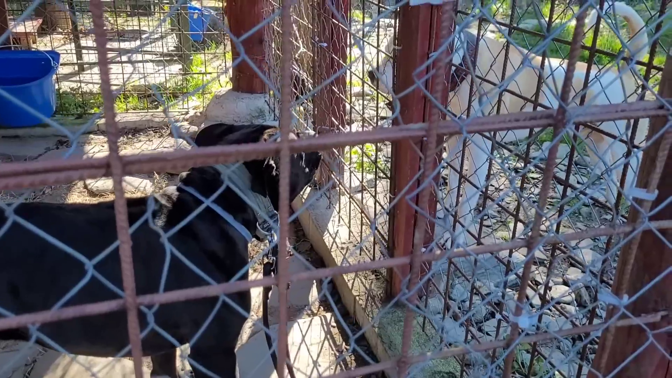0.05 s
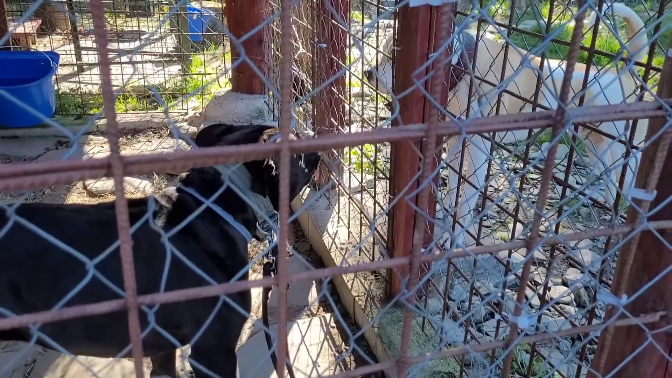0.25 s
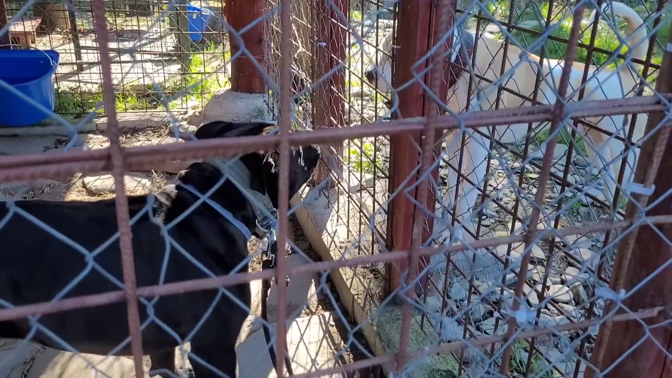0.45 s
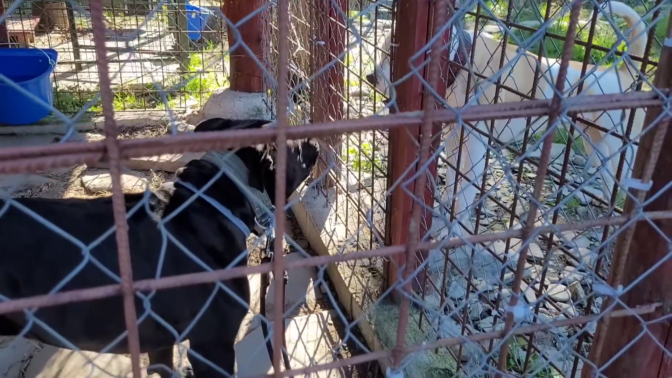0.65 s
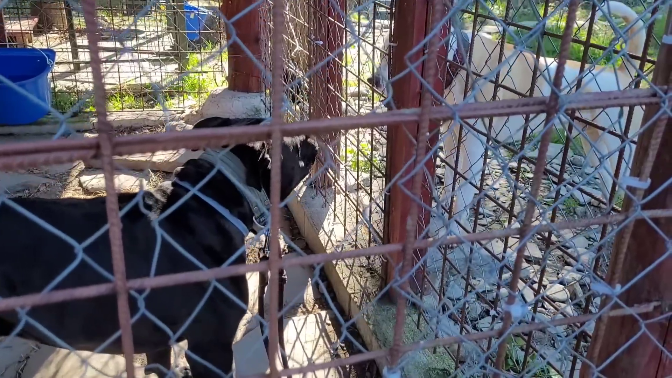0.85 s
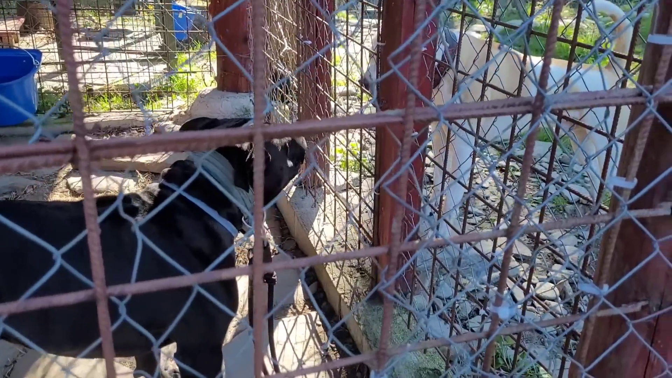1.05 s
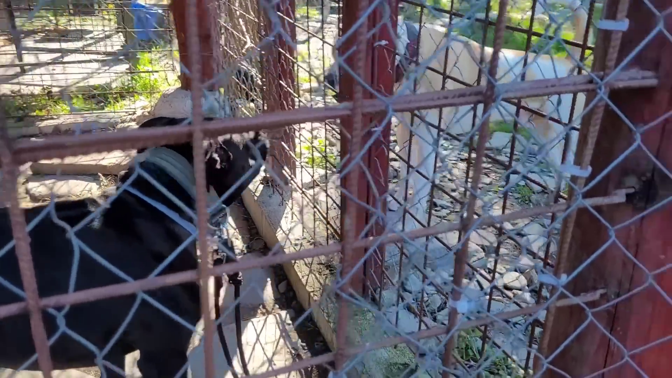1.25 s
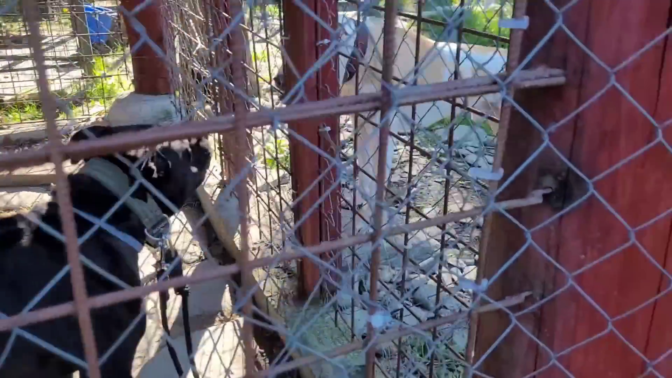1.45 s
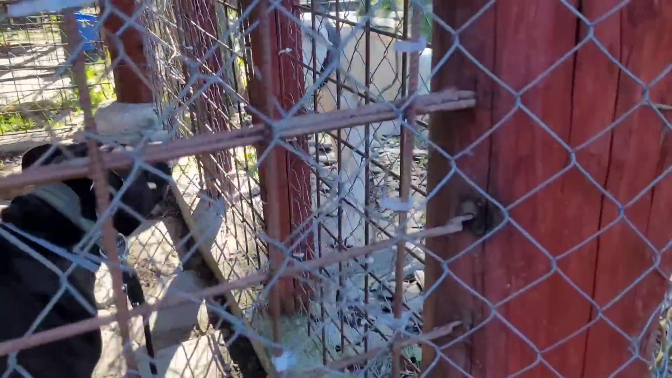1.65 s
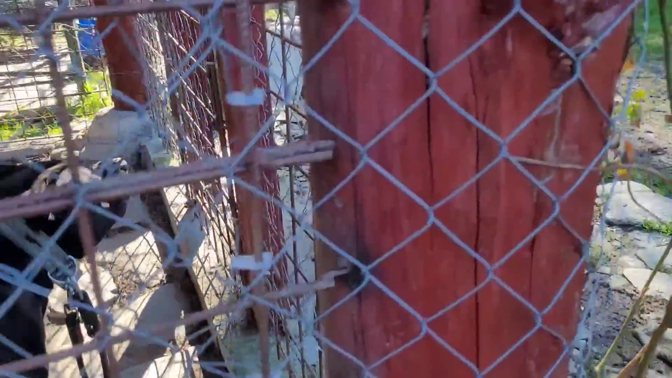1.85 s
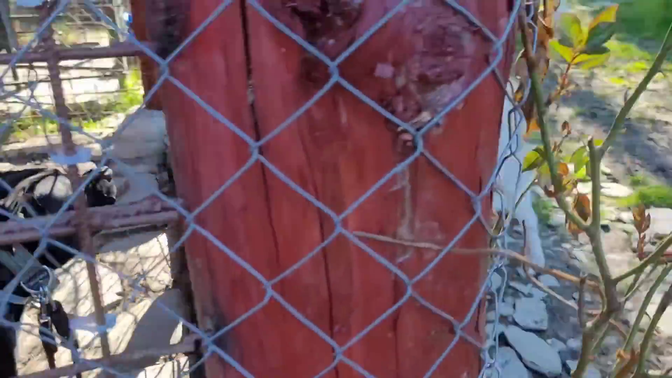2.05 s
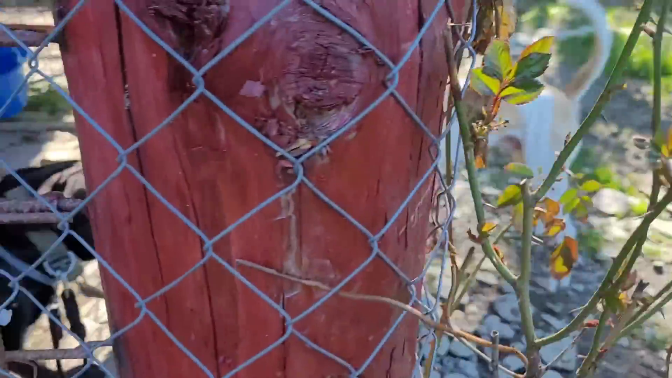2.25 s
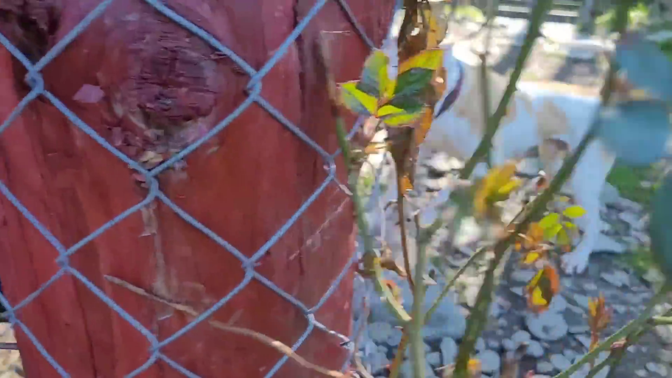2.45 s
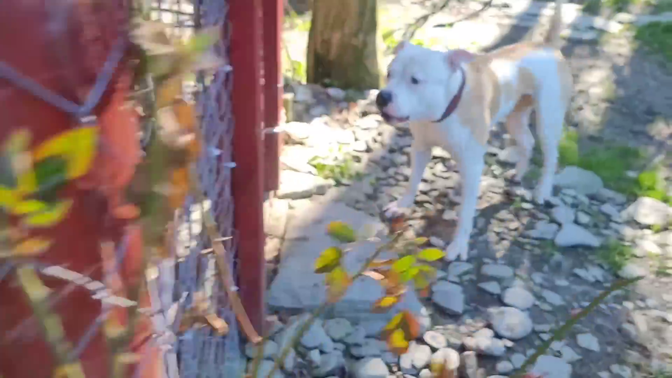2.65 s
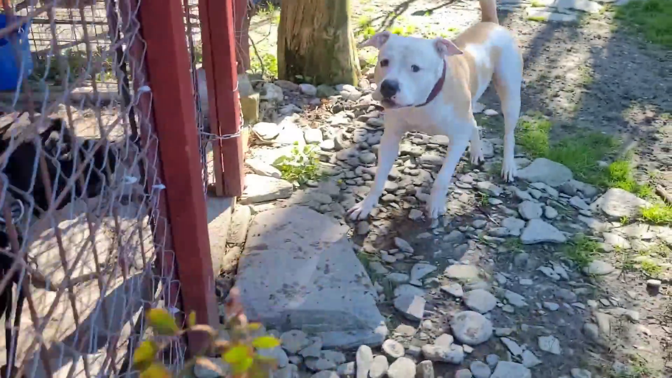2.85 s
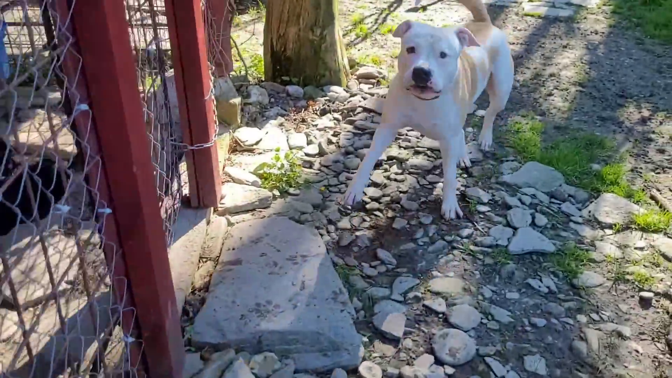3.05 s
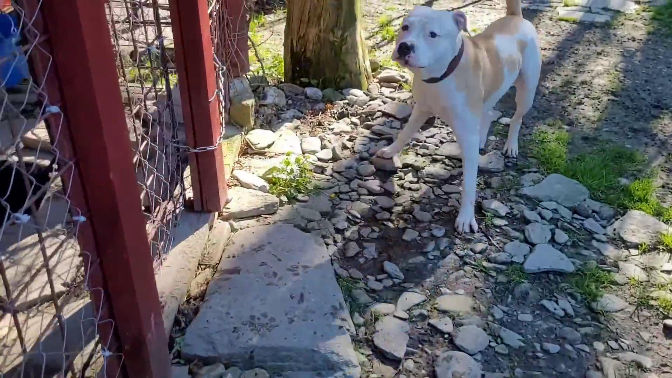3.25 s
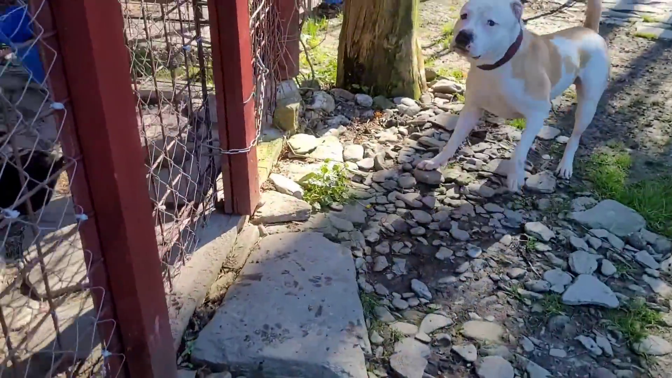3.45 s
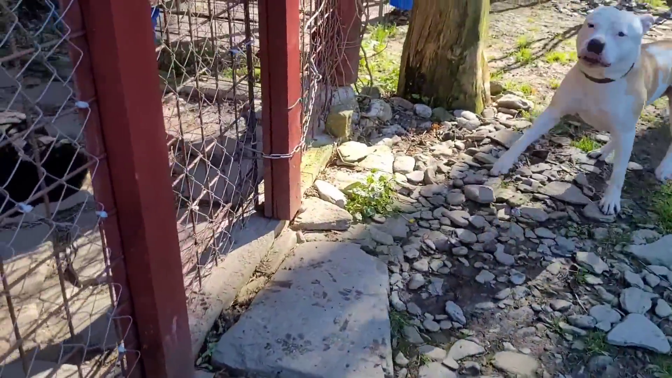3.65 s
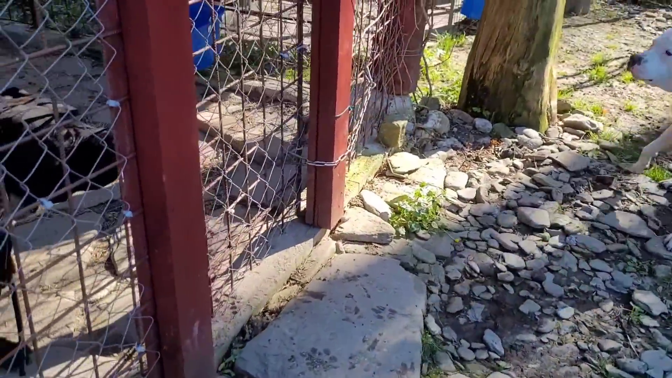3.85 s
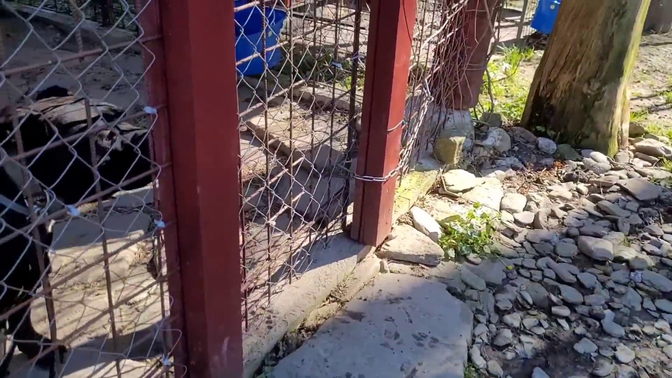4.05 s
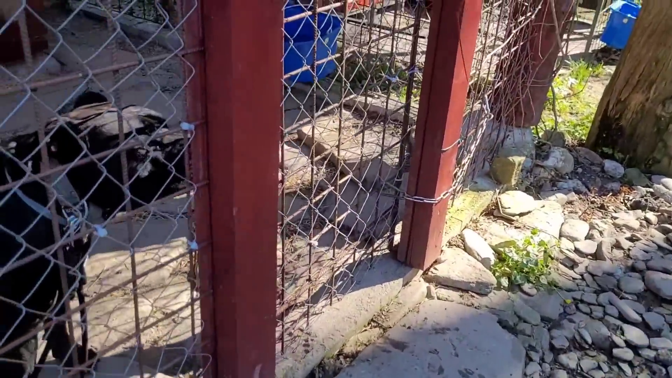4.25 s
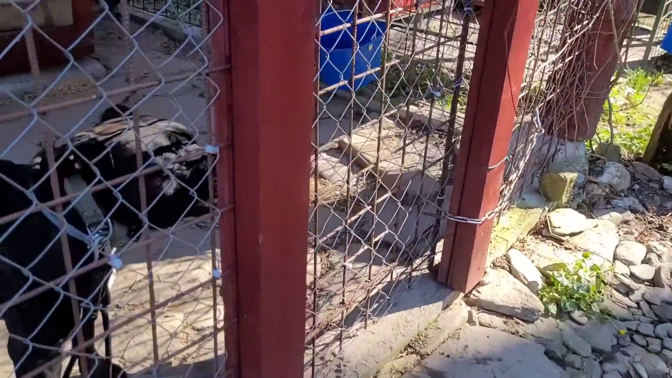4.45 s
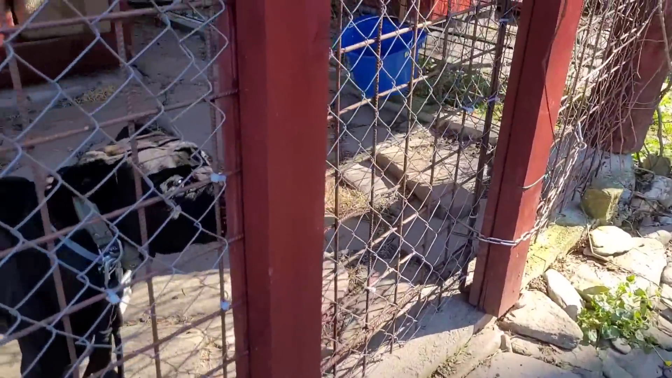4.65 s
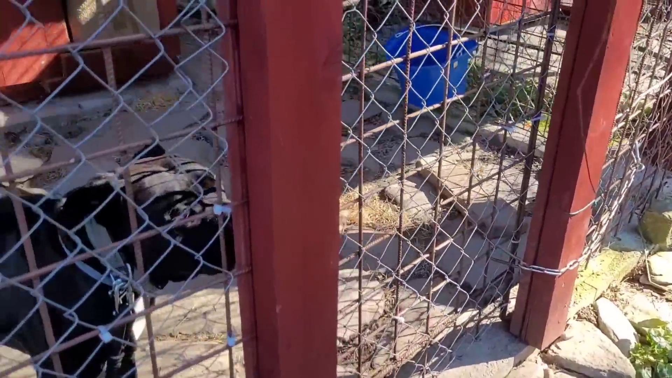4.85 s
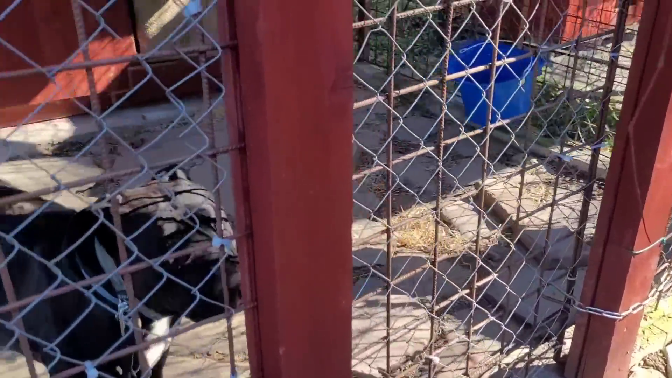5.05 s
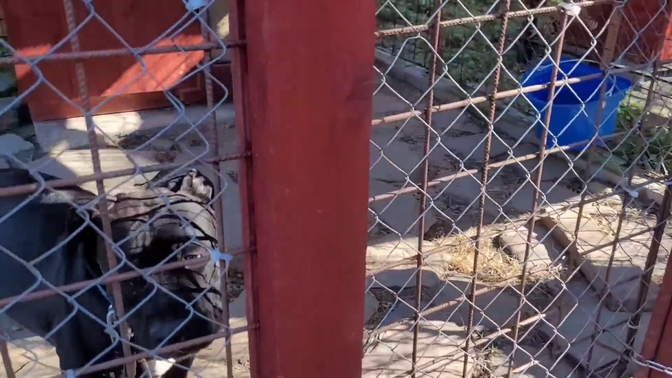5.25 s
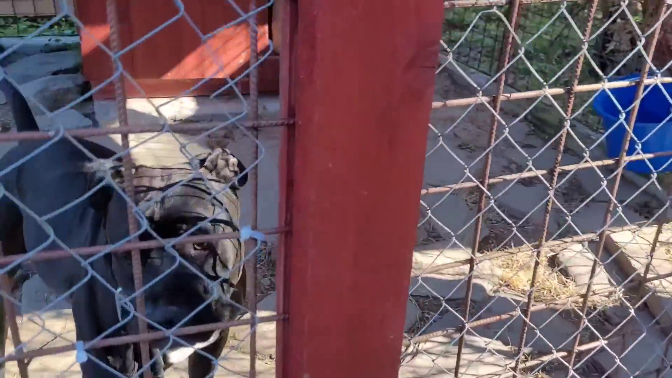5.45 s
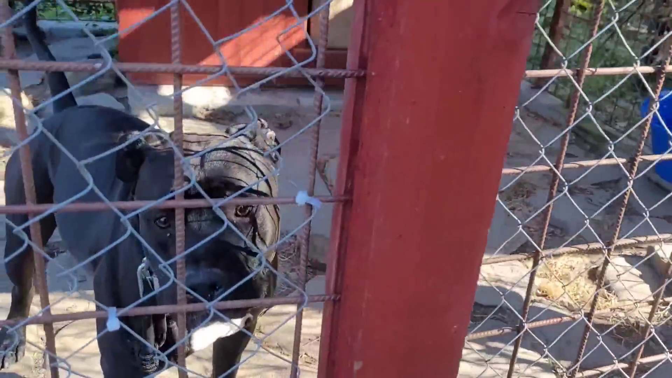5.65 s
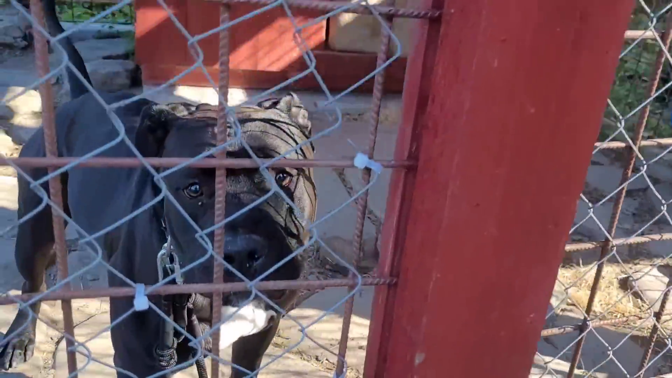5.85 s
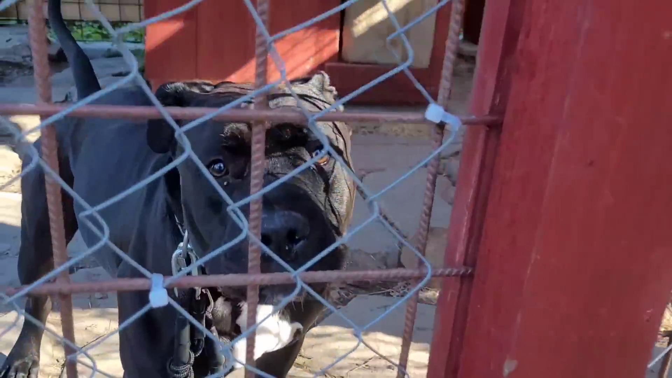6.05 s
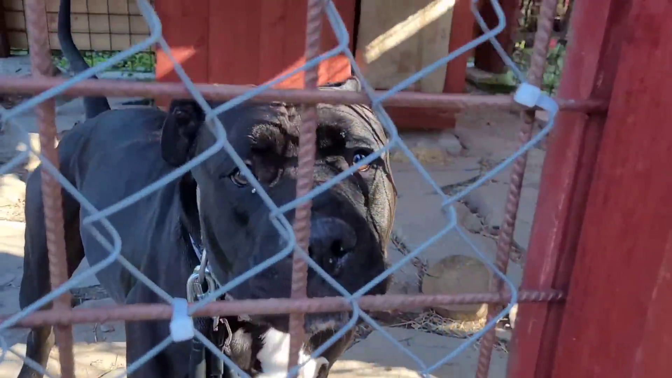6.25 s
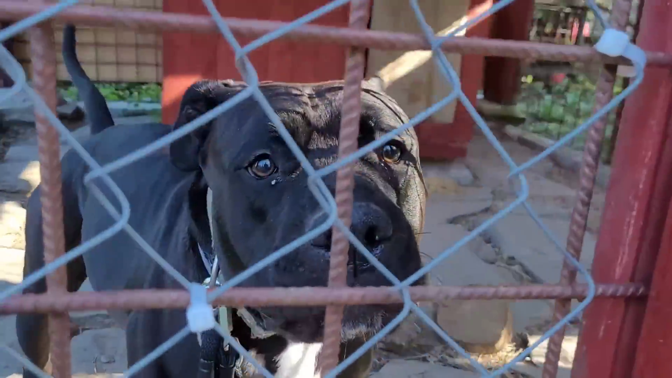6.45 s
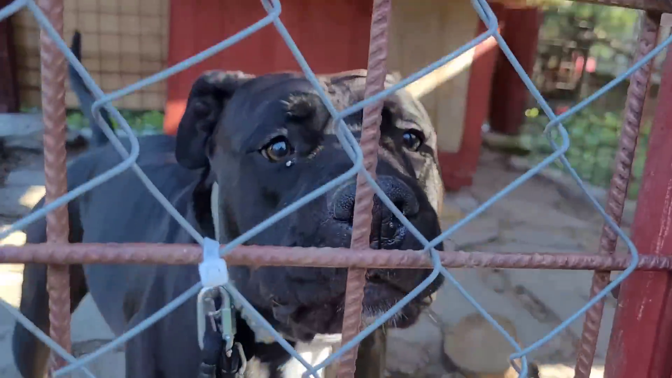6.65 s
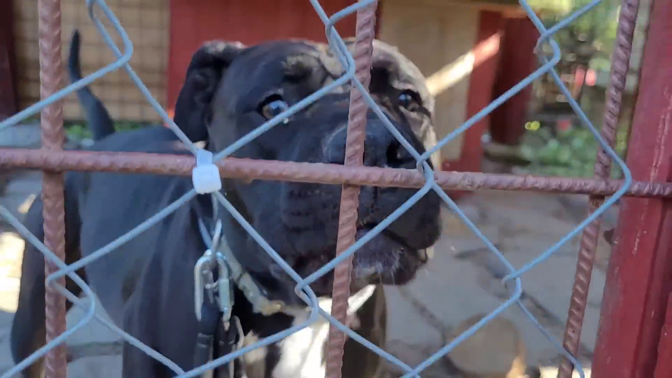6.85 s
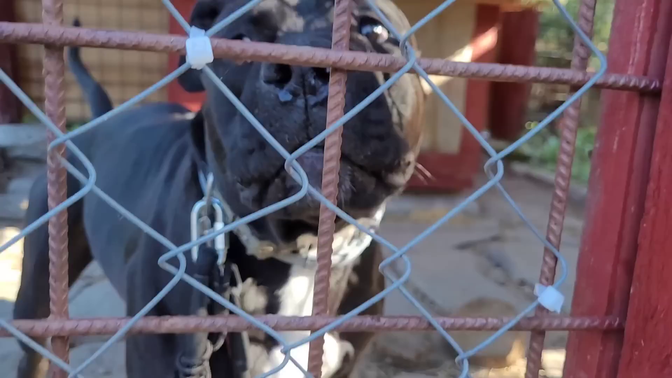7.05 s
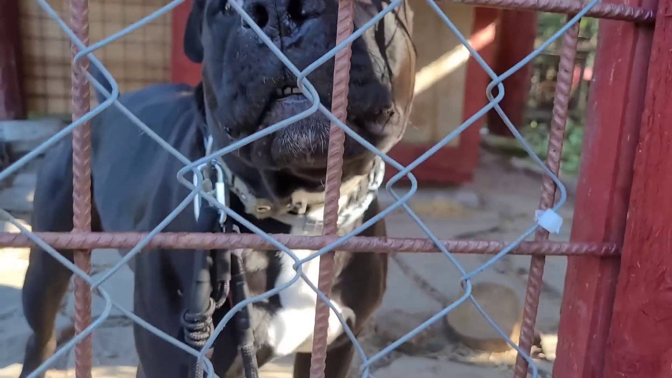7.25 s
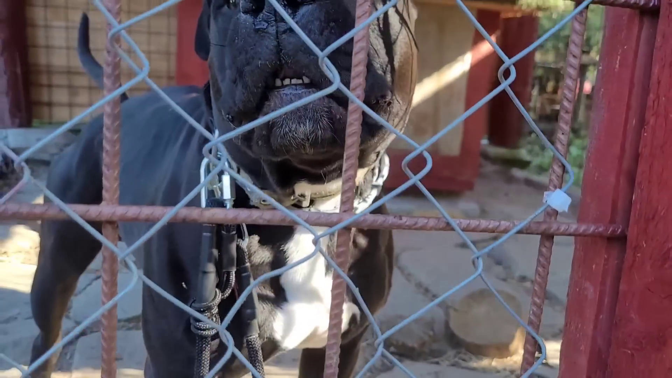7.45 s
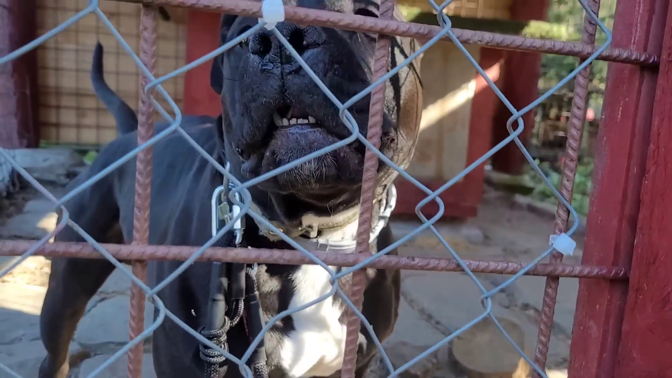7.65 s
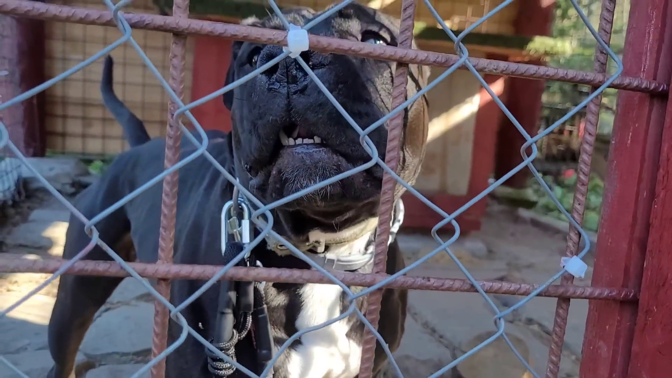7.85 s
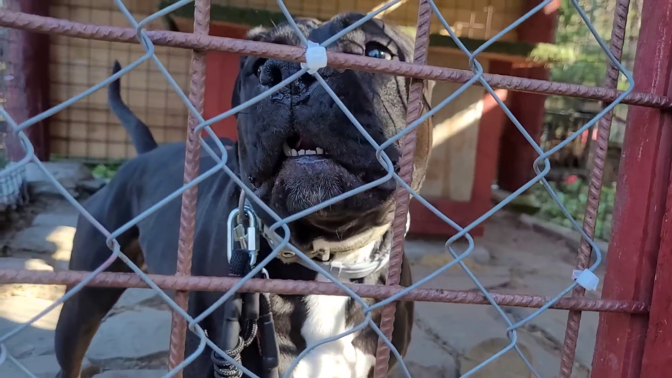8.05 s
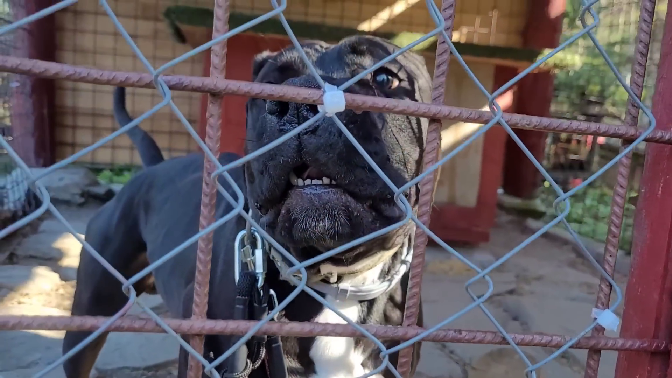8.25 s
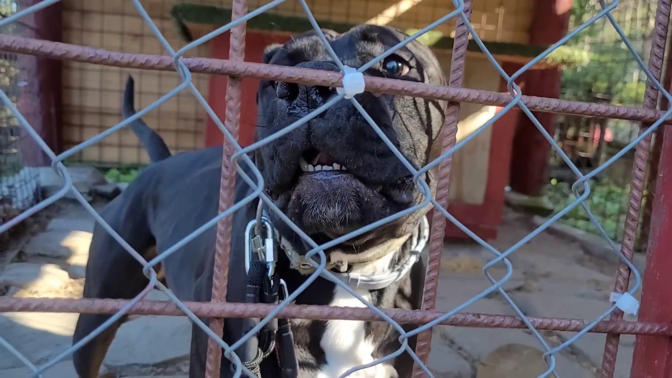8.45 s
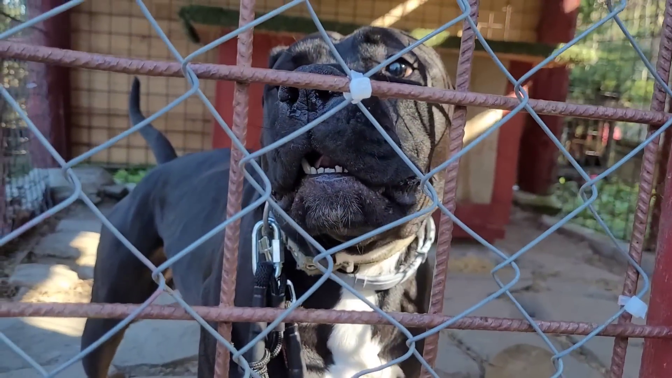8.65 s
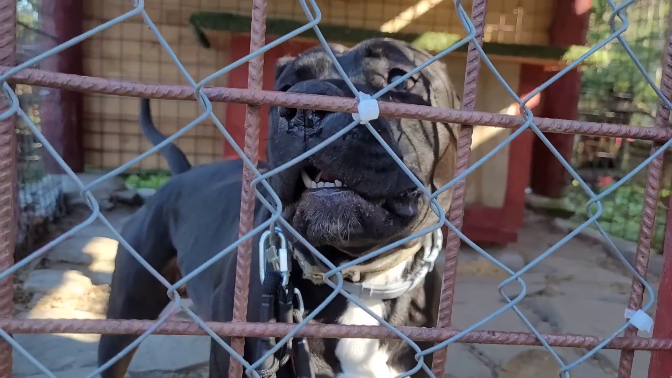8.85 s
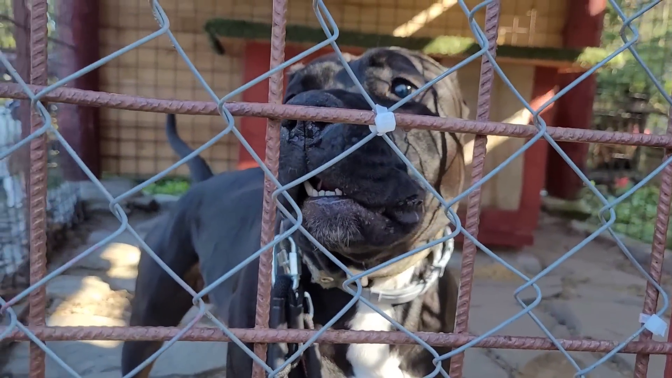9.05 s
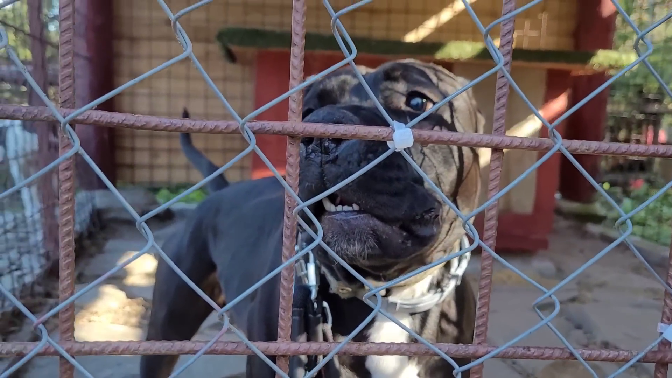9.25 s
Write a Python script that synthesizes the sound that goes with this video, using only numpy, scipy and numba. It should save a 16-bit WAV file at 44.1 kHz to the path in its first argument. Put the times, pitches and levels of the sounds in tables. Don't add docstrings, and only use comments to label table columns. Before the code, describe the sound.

A big dog growls low and throbbing behind a wire fence, with hoarse double barks from a nearby dog and one sharp bark of its own.

```python
import sys
import numpy as np
from scipy import signal
from scipy.fft import rfft, irfft, next_fast_len
from scipy.io import wavfile
from scipy.ndimage import uniform_filter1d, map_coordinates
from numba import njit

SR = 44100
rng = np.random.default_rng(int(sys.argv[2]) if len(sys.argv) > 2 else 0)


def invert_db(x):
    u = np.asarray(x, float) / 20
    return 10 ** u


def dump(signal):
    limited = np.clip(np.atleast_2d(signal).T, -1, 1)
    pcm = np.round(limited * 32767).astype(np.int16)
    wavfile.write(sys.argv[1], SR, pcm)


N = 410571
T = np.arange(N) / SR

# [f/Hz, level/dB per Hz]
YARD_SPECTRUM = [(47, -39), (80, -11.5), (107, -13.5), (173, -2), (258, -5.5), (302, -10), (360, -8.5),
                 (548, -6.5), (781, -13.5), (2160, -21), (2880, -26), (7130, -33), (8700, -44.5),
                 (13800, -37), (15800, -66)]
WIND_SPECTRUM = [(12, -48), (20, -25), (48, -5.5), (65, -0.5), (168, -15.5), (211, -18), (300, -18.5),
                 (390, -45), (660, -120)]
# [f/Hz, correlation]
YARD_ALIKE = [(100, 1.0), (2000, 0.12), (8000, 0.1)]
WIND_ALIKE = [(30, 0.55)]
# [t/s, level/dB, half length/s]
GUSTS = [(1.8, 11, .45), (2.76, 15, 0.0754), (3.97, 18, 0.14), (4.223, 10, 0.075), (4.4, 11, 0.057),
         (4.8, 7.5, .3), (5.398, 13, 0.094), (6.3, 6, 0.99), (7.9, 5, 0.19), (8.65, 11, 0.26),
         (9.3, 14, 0.37)]
# [t/s, gain/dB]
CAMERA_GAIN = [(0, -1.5), (1.7, 0), (2.4, -2), (2.7, -7.5), (2.83, -10.5), (2.98, -18.5), (3.29, -19.5),
               (3.78, -10.5), (3.94, -5.5), (4.3, 0), (8.15, 2), (8.32, -11), (8.95, -9.5), (9.31, -5)]
YARD_DB, WIND_DB = -42.5, -52

# [t/s, length/s, f/Hz, level/dB]
BIRD = [(.05, .13, 7000, -69), (1.152, .14, 6900, -64.5)]

# [f/Hz, time to fall 60 dB/s]
PEN_DECAY = [(150, 0.26), (1000, 0.12), (8000, 0.035)]
# [f/Hz, level/dB]
PEN_ECHO = [(150, -20), (500, -15), (1500, 3), (8000, -1)]

# [t/s, peak level/dB, left over right/dB, f/Hz]
OTHER_CLICKS = [(4.137, -33, -4, 4300), (3.49, -34.5, 3, 4200), (1.7428, -24, -0.5, 3300),
                (3.419, -31, 0, 560), (1.7424, -19, 1, 1450), (3.1976, -40, 6.5, 6100),
                (6.8003, -15.5, -5.5, 3700), (6.8344, -20, 1.5, 3600), (6.8645, -25.5, -8, 3300)]
# [t/s, peak level/dB, left over right/dB]
CHAIN_CLICKS = [(1.6194, -39, -5), (1.741, -21, 2), (1.8282, -28.5, 4), (4.1702, -27, 0),
                (4.3241, -28.5, 0.5), (5.6256, -42.5, -1.5), (6.2228, -27.5, 6), (6.995, -32, -1),
                (7.864, -26, 0.5), (8.114, -35.5, -9)]
WIRE_CLICKS = [(3.5927, -54, -8), (5.0594, -33, -3.5), (6.4577, -37.5, 2), (6.5999, -46.5, 5),
               (6.9157, -30.5, 1), (7.1192, -31, 3.5), (7.2469, -27.5, 4), (8.5335, -32, 8),
               (8.7538, -41.5, 15)]
POST_KNOCKS = [(1.952, -24, -8.5), (1.964, -29, -8), (1.97, -29, -8), (1.976, -19.5, -7.5),
               (3.419, -27.5, -2), (4.306, -34, -3)]
TEETH_TICKS = [(1.6187, -40, -0.5), (1.8183, -37, -2.0), (1.9535, -40, -2.5), (1.9714, -33, -2.0),
               (2.0712, -35, -2.5), (2.7033, -51, -2.0), (2.8115, -54, -1.0), (3.1961, -42, 3.5),
               (3.3463, -60, -2.5), (3.4905, -46, 1.0), (3.5848, -60, -1.0), (3.6446, -56, 1.5),
               (3.6915, -63, -1.0), (3.7848, -58, 1.5), (3.8387, -48, 2.0), (3.909, -49, 0.5),
               (3.9659, -44, -1.5), (4.137, -46, 2.0), (4.2867, -47, -0.5), (4.6224, -45, 0.5),
               (5.1497, -39, -1.5), (5.4041, -39, 1.0), (5.6256, -35, -2.5), (5.8561, -43, 1.5),
               (5.9773, -35, 2.0), (6.0901, -33, 2.0), (6.1898, -38, 1.5), (6.2921, -35, 0.0),
               (6.3764, -26, -6.5), (6.3999, -28, -6.5), (6.4577, -35, -2.0), (6.564, -31, -6.5),
               (6.5999, -39, 2.0), (6.7486, -38, 0.0), (6.7994, -21, -2.5), (6.8339, -34, -1.0),
               (6.9052, -36, 2.0), (7.2464, -35, 1.5), (7.3587, -36, 8.5), (7.5078, -40, 7.5),
               (7.8945, -38, 3.0), (8.6218, -43, 9.0), (8.7545, -39, 3.0)]
CHAIN_HZ, WIRE_HZ, POST_HZ, TOOTH_HZ = 1870, 4630, 836, 11600
SPIT_DB, SPIT_GROWS = -58, .3

# [t/s, length/s, f/Hz, width/Hz, level/dB]
SNIFFS = [(1.96, .07, 6050, 500, -49.5), (1.955, .045, 12000, 4000, -56), (1.87, .05, 10800, 500, -62),
          (3.935, .1, 12500, 5000, -62), (2.719, .115, 1190, 250, -53.5), (2.72, .115, 2050, 350, -56),
          (2.72, .115, 4160, 2200, -58), (3.34, .04, 11040, 3000, -71), (3.879, 0.033, 650, 30, -51),
          (8.105, .025, 2330, 120, -38), (8.175, .03, 5400, 900, -33.5)]

# [peak t/s, level/dB, rise/s per 20 dB, fall/s per 20 dB, throat f/Hz]
BARKS = [
    [(2.08, -19, .012, .05, 600), (2.098, -8.5, .025, 0.025, 580), (2.125, -13, .015, .04, 516),
     (2.16, -13, .08, .06, 540), (2.195, -7.5, 0.05, 0.08, 640), (2.245, -7.5, 0.1, .07, 680),
     (2.284, -6.5, .035, .035, 610), (2.314, -6, .03, .035, 500), (2.352, -11.5, .08, .05, 530),
     (2.39, -24, .05, .2, 520), (2.475, -21, .07, .05, 540), (2.515, -10.5, 0.08, 0.045, 545),
     (2.555, -20, 0.05, 0.09, 530), (2.6, -30, .05, .06, 480), (2.73, -37, 0.015, 0.18, 521),
     (2.81, -44, 0.38, 0.03, 518), (3.898, -52.5, 0.3, 0.3, 621)],
    [(8.113, -9, 0.025, 0.1, 440), (8.14, -10.5, .06, .1, 430), (8.18, -10.5, 0.1, 0.1, 520),
     (8.214, -6, 0.06, 0.035, 440), (8.245, -16, .05, .05, 500), (8.264, -12, 0.03, 0.04, 440),
     (8.295, -19, 0.08, 0.12, 330)],
]
# [t/s, f/Hz, upper jaw gain/dB]
BARK_PITCH = [
    [(2.095, 290, 1), (2.165, 250, -11), (2.21, 340, -1), (2.275, 435, 0), (2.33, 400, -1), (2.39, 280, 1),
     (2.45, 385, -9), (2.56, 390, -12), (2.6, 285, -12)],
    [(8.1, 310, 9), (8.125, 290, 5), (8.15, 390, 0), (8.18, 435, 0), (8.225, 440, -2), (8.26, 370, -4),
     (8.29, 280, -6), (8.33, 290, -6)],
]
# [f/Hz, level/dB per Hz]
JAWS = [
    [(600, -28), (950, 3), (1200, 8), (1450, -7.5), (1750, -5.5), (2050, -6), (2400, -11), (2800, -19),
     (3300, -22), (5000, -63)],
    [(600, -12), (950, 7), (1200, -1), (1450, -11.5), (1750, -19.5), (2050, -15.5), (2400, -31),
     (2800, -25), (3300, -41), (5000, -57.5)],
]
# [f/Hz, level/dB per Hz]
SNARL = [(1940, -44.5), (3300, -11.5), (4000, -3.5), (5450, -2.5), (6600, -12.5), (7290, -10.5),
         (8540, -23.5), (10200, -16), (12100, -15), (16000, -25)]
THROAT_REST_HZ = [559, 419]
HISS_DB_PER_HZ = [0.0259, 0.0432]
LINE_LIFT_DB = [-1, 8]
PEAK_DB = -9
JAWS_DB, HISS_DB, LINE_DB = -13.5, -32.5, -13
HISS_KEEPS, LINE_KEEPS = 0.23, .6
JAWS_DB_PER_HZ, JAWS_KEEP = 0.04, .12
GAPE_HZ = 1500

# [t/s, pitch f/Hz, effort level/dB, airflow level/dB, lips open 0-1]
GROWLS = [
    [(1.05, 116, -50, -79, .5), (1.17, 117.1, -42, -71, .5), (1.55, 120.9, -36, -60.5, 0.5),
     (1.92, 123.1, -39, -55.5, 1), (2.2, 121.3, -37.5, -52, .9)],
    [(4.5, 124, -61, -60, 0.4), (4.62, 125, -44.5, -63.5, 0.3), (4.94, 128, -33.5, -57, 0.8),
     (5.35, 131, -34.5, -53.5, 0.46), (5.7, 132, -24.5, -52.5, 0.65), (6.4, 133, -21.5, -51, 0.5),
     (7.05, 138, -20.5, -48, 0.6), (7.28, 139.5, -20, -47, 1), (8.08, 148, -19, -48, 0.87)],
    [(8.36, 149, -23.5, -55, 0.35), (8.8, 150.5, -25.5, -55, 0.1), (9.31, 160, -22.5, -54, .4)],
]
# [t/s, throbs per s]
FLUTTER = [
    [(1.1, 24.35), (1.42, 20.09), (1.73, 20.57), (2.05, 18.8)],
    [(4.55, 23.58), (5.23, 18.21), (5.57, 20.08), (5.91, 18.44), (6.25, 20.2), (6.59, 19.01), (7.6, 20.55),
     (7.94, 19.44), (9.3, 20.05)],
]
FLUTTER_START = (.87, .5)
# [throat over pitch, second band over pitch, second band level/dB, chest level/dB,
# mouth level/dB, earlier start of breath/s]
POSTURE = [
    (3.7, 1.93, 0, -28.5, -44, 0.055),
    (3.011, 2.0, -4.5, -30.5, -34.5, 0.59),
]
CLEAR = [.1, .3]
NOSTRILS_SHUT_S = [1.7, 12]
# [f/Hz, width/Hz, level/dB]
NOSE = [(4580, 820, 1.5), (5250, 910, 3), (5956, 230, 4), (7600, 460, -8)]
TEETH = [(9200, 900, -4.5), (9980, 1300, -0.5), (11700, 1700, 5), (13400, 660, 0.5), (14920, 2200, -10.5)]
MOUTH = [(630, 90, 5), (771, 156, -3.5), (1010, 110, -7.5), (1302, 150, -27.5)]
LIPS = [(1426, 87, 8), (2050, 920, 3.5), (2740, 240, 9.5), (2800, 210, -8)]
SLACK_LIPS = [(774, 300, -7), (1060, 280, -3.5), (2100, 200, -22)]
FULL_DB, LOOSE_HZ = -22, 131
CHEST_GROWS, MOUTH_GROWS = 0.61, 0.57
SQUEEZE_DB_PER_HZ = 0.13
LOOSE_THROB, TIGHTEN_PER_HZ, TIGHT_THROB = 0.45, 0.022, 0.14
THROAT_RISE_PER_HZ = .008
UPPER_RATIO, UPPER_DB, UPPER_DB_PER_HZ = 1.2, -11, .5
LIPS_SHUT_DB, LIPS_SPAN_DB = -38.5, 37.5
TEETH_DB, TEETH_LOOSE_DB, TEETH_GROWS = -15, 27, .35
GAP_SHUT_DB, GAP_OPEN_DB = 6.5, -10
SHUT_DB = -8
RATTLE_S, RATTLE_THROB = 9.0, .18


def unit(x):
    return x / np.sqrt(np.mean(x ** 2) + 1e-20)


def even(x, seconds):
    return x / np.sqrt(abs(uniform_filter1d(x * x, int(seconds * SR))) + 1e-12)


def along(points, hz):
    f, v = np.transpose(points)
    return np.interp(np.log(hz + 1), np.log(f + 1), v)


def curves(rows):
    s, *columns = np.transpose(rows)
    return [np.interp(T, s, column) for column in columns]


def gate(start, end, rise, fall):
    return np.clip(np.minimum((T - start) / rise, (end - T) / fall) + 1, 0, 1)


def wobble(rate):
    return map_coordinates(rng.standard_normal(int(N * rate / SR) + 4), [T * rate])


def filtered(x, response):
    m = next_fast_len(N + 8192)
    return irfft(rfft(x, m) * response(np.fft.rfftfreq(m, 1 / SR)), m)[..., :N]


def lowpass(x, hz, order):
    return filtered(x, lambda f: 1 / (1 + (f / hz) ** order))


def modes(table):
    def response(f):
        total = 0
        for k, (centre, width, db) in enumerate(table):
            ring = 1j * f * width / (centre * centre - f * f + 1j * f * width)
            total = total + (-1) ** k * invert_db(db) * ring
        return total
    return response


@njit
def resonate(x, turn, radius):
    y = np.zeros(len(x))
    for i in range(2, len(x)):
        y[i] = x[i] - x[i - 2] + 2 * radius * np.cos(turn[i]) * y[i - 1] - radius * radius * y[i - 2]
    return y


def cavity(x, hz, width_hz):
    return resonate(x, 2 * np.pi * hz / SR, np.exp(-np.pi * width_hz / SR))


def two_cavities(x, hz, width_hz, second_width_hz):
    return cavity(cavity(x, hz, width_hz), hz, second_width_hz)


def arrival(lag):
    return lambda f: np.exp(np.outer([1, -1], 1j * np.pi * f * lag / SR * f ** 2 / (f ** 2 + 900 ** 2)))


def panned(db):
    return invert_db(np.array([[.5], [-.5]]) * db)


def placed(x, lag, pan_db, wet_db):
    hz, t, z = signal.stft(rng.standard_normal((2, SR // 4)), SR, nperseg=256)
    tail = signal.istft(z * invert_db(-60 * t / along(PEN_DECAY, hz)[:, None]), SR, nperseg=256)[1]
    wet = signal.fftconvolve(x[None], tail / np.linalg.norm(tail[0]), axes=1)[:, :N]
    wet = filtered(wet, lambda f: invert_db(wet_db + along(PEN_ECHO, f)))
    return (filtered(x, arrival(lag)) + wet) * panned(pan_db)


def rush(spectrum, alike, patchy_db):
    z = signal.stft(rng.standard_normal((2, N)), nperseg=512)[2]
    patches = uniform_filter1d(uniform_filter1d(rng.standard_normal(z.shape[1:]), 6, 0), 10, 1)
    pair = signal.istft(z * invert_db(patchy_db * unit(patches)), nperseg=512)[1][:, :N]

    def shape(f):
        turn = np.arccos(np.clip(along(alike, f), -1, 1)) / 2
        return invert_db(along(spectrum, f)) * [np.cos(turn), np.sin(turn)]
    mid, side = filtered(pair, shape)
    return unit(np.array([mid + side, mid - side]))


def yard():
    gain_db = curves(CAMERA_GAIN)[0]
    gust_db = sum(db * np.exp(-((T - s) / half) ** 2) for s, db, half in GUSTS)
    lumps = invert_db(1.9 * np.array([wobble(9.4), wobble(16)]) + np.array([[3], [-3]]))
    far = filtered(rush(YARD_SPECTRUM, YARD_ALIKE, patchy_db=1.5), arrival(22))
    wind = unit(lumps * rush(WIND_SPECTRUM, WIND_ALIKE, patchy_db=1.5))
    return invert_db(YARD_DB + gain_db) * far + invert_db(WIND_DB + gain_db + gust_db) * wind


def bird():
    out = np.zeros(N)
    for s, length, hz, db in BIRD:
        tone = np.sin(2 * np.pi * np.cumsum(hz * (1 + 0.0037 * wobble(60))) / SR)
        out += invert_db(db + 2.5 * wobble(50)) * gate(s, s + length, .02, 0.025) * tone
    return out


def clicks():
    out, t = np.zeros((2, N + SR)), np.arange(2048) / SR
    f = np.fft.rfftfreq(len(t), 1 / SR)
    contacts = list(OTHER_CLICKS)
    for rows, hz in [(CHAIN_CLICKS, CHAIN_HZ), (WIRE_CLICKS, WIRE_HZ), (POST_KNOCKS, POST_HZ), (TEETH_TICKS, TOOTH_HZ)]:
        contacts += [(*row, hz) for row in rows]
    for s, db, pan_db, hz in contacts:
        noise = rng.standard_normal((3, len(t)))
        fade = invert_db(-60 * t / .011) + invert_db(-17 - 60 * t / .09)
        blow = fade * (noise[0] + .8 * noise[1:])
        body = irfft(rfft(blow) * modes([(hz, 1.3 * hz, 0)])(f) ** 2 / (1 + (f / (1.94 * hz)) ** 6))
        spit = irfft(rfft(invert_db(-60 * t / 0.024) * noise[1:]) * modes([(12000, 6000, 0)])(f) ** 2)
        treble_db = SPIT_DB + SPIT_GROWS * (db + 29.5) - db
        both = body / abs(body).max() + invert_db(treble_db) * spit / abs(spit).max()
        both = both * np.cos(np.pi / 2 * t / t[-1])
        out[:, round(s * SR):][:, :len(t)] += invert_db(db) * panned(pan_db) * both
    return out[:, :N]


def sniffs():
    out = np.zeros((2, N))
    for s, length, hz, width_hz, db in SNIFFS:
        ports = rng.standard_normal((2, N))
        puff_air = unit(np.array([cavity(port, hz + 0 * T, width_hz) for port in ports]))
        out += invert_db(db) * gate(s, s + length, .015, .01) * puff_air
    return out


def folds(cycles, jitter, scatter_db, sub_db):
    at = np.flatnonzero(np.diff(np.floor(cycles)))
    chance = rng.standard_normal((len(at), 2))
    at = np.clip(at + chance[:, 0] * jitter[at] / np.gradient(cycles)[at], 0, N - 1).astype(int)
    strength_db = scatter_db * chance[:, 1] + sub_db * (-1) ** np.arange(len(at))
    pulses = np.bincount(at, invert_db(strength_db), N)
    return unit(pulses - pulses.mean())


def bark(dog, lag, pan_db, wet_db):
    bursts, rest_hz = BARKS[dog], THROAT_REST_HZ[dog]
    power = 0
    for s, db, rise, fall, _ in bursts:
        drop = np.minimum(np.maximum((s - T) / rise, (T - s) / fall), 9)
        power = power + invert_db(db - 20 * drop) ** 2
    level = np.sqrt(power)
    strain = np.clip(uniform_filter1d(level, int(.05 * SR)) / invert_db(PEAK_DB), 1e-3, 1.2)
    slack_db = np.clip(-20 * np.log10(strain), 0, 35)
    pitch, gape_db = curves(BARK_PITCH[dog])
    cycles = np.cumsum(pitch * (1 + .03 * wobble(60))) / SR
    gush = 1 + 0.57 * np.cos(2 * np.pi * cycles)
    source = folds(cycles, jitter=0.12 + 0 * T, scatter_db=3.5, sub_db=1.0)
    source = source + 1.1 * unit(rng.standard_normal(N) * gush)

    throat_hz = curves([(row[0], row[4]) for row in bursts])[0]
    opened_hz = throat_hz - rest_hz
    jaws_db = JAWS_DB + JAWS_DB_PER_HZ * opened_hz + JAWS_KEEP * slack_db
    hiss_db = HISS_DB + HISS_DB_PER_HZ[dog] * opened_hz + HISS_KEEPS * slack_db
    line_db = LINE_DB + LINE_LIFT_DB[dog] + LINE_KEEPS * np.minimum(slack_db, 43 - slack_db)

    def band(hz, width_hz):
        return even(two_cavities(source, hz, width_hz, 2 * width_hz), 0.1)
    low = band(throat_hz, 110) + .6 * band(1.38 * throat_hz, 110) + 0.4 * band(0.816 * throat_hz, 81)
    voice = even(even(low, 0.032) + invert_db(line_db) * band(pitch, 50), .025)
    voice = lowpass(voice, 1050, 6)
    jaw = even(filtered(source, lambda f: invert_db(along(JAWS[dog], f))), 0.13)
    high = filtered(jaw, lambda f: 1 - 1 / (1 + (f / GAPE_HZ) ** 8))
    voice += invert_db(jaws_db) * (jaw + (invert_db(gape_db) - 1) * high)
    air = rng.standard_normal((3, N))
    air = (0.53 * air[0] + air[1:]) * gush
    hiss = invert_db(hiss_db) * unit(filtered(air, lambda f: invert_db(along(SNARL, f))))
    effort = level * invert_db(1.3 * wobble(80))
    voice = filtered(effort * voice, lambda f: f ** 4 / (f ** 4 + 190 ** 4))
    return placed(voice, lag, pan_db, wet_db) + filtered(effort * hiss, arrival(lag))


def swell(throb, share, late):
    return 1 + np.clip(share, 0, 1) * np.cos(throb - late)


def puff(throb, late, sharp):
    return np.exp(sharp * (np.cos(throb - late) - 1))


def nose_breath(air, throb):
    nose = air * invert_db(1.6 * wobble(40)) * (1 + 0.49 * puff(throb, 1.1, 4.5) * invert_db(4.5 * wobble(10)))
    nostril_hz = 4820 + 110 * wobble(6.5)
    chirp = 0.7 + 1.5 * puff(throb, 1.8, 5.5)
    whistle = np.array([cavity(port, nostril_hz, 200) for port in nose * chirp])
    return unit(filtered(nose, modes(NOSE))) + 0.97 * unit(whistle)


def teeth_breath(air, throb, depth, opening):
    teeth = air * invert_db(1.4 * wobble(76) + 1.4 * wobble(5.4))
    teeth = teeth * (1 + 1.9 * depth * puff(throb, 1.1, 6) * invert_db(3 * wobble(15)))
    gap_db = GAP_SHUT_DB + (GAP_OPEN_DB - GAP_SHUT_DB) * opening + 2.5 * wobble(4)
    gap = invert_db(gap_db) * filtered(teeth, modes(TEETH[2:3]))
    others = invert_db(1.8 * wobble(7)) * filtered(teeth, modes(TEETH[:2] + TEETH[3:]))
    return unit(gap + others)


def throat_voice(source, rasp, cycles, throb, depth, throat_hz, tight, clear):
    main = even(two_cavities(source, throat_hz, 55, 115), .045)
    overtone = clear * swell(throb, .8, 5.4) * np.cos(6 * np.pi * cycles)
    main = swell(throb, depth, 5.35) * even(main + overtone, .035)
    main = lowpass(main, 750, 6)
    upper_hz = UPPER_RATIO * throat_hz
    upper = cavity(source + rasp, upper_hz * (1 + .03 * wobble(8)), 90)
    upper = even(cavity(upper, upper_hz, 160), .2)
    upper_db = UPPER_DB + UPPER_DB_PER_HZ * np.minimum(tight, 9)
    return even(main + invert_db(upper_db) * swell(throb, .6, 3.4) * upper, 0.13)


def mouth_voice(source, rasp, throb, rattle):
    def steep(f):
        return f ** 2 / (f + 500 / 1j) ** 2 / (1 + (f / 1300) ** 12)
    mouth = filtered(source + 1.2 * rasp, lambda f: modes(MOUTH)(f) * steep(f))
    slap = filtered(source + rasp, lambda f: modes(SLACK_LIPS)(f) / (1 + (f / 2500) ** 8))
    slap = rattle * puff(throb, .1, 3.1) * unit(slap)
    return even(swell(throb, 0.22, 2.2) * mouth, 0.58) + 2.54 * slap


def growl(rows, which):
    hz, throat_db, nose_db, opening = curves(rows)
    throat_ratio, second_ratio, second_db, chest_db, mouth_db, lead_s = POSTURE[which]
    flutter = FLUTTER[which]
    tight = np.maximum(hz - LOOSE_HZ, 0)
    rattle = gate(RATTLE_S, N / SR, 0.028, 1)
    loose_depth = np.maximum(LOOSE_THROB - TIGHTEN_PER_HZ * tight, TIGHT_THROB)
    depth = loose_depth + RATTLE_THROB * rattle
    throat_hz = (throat_ratio + THROAT_RISE_PER_HZ * tight) * hz
    extra_db, squeeze_db = throat_db - FULL_DB, SQUEEZE_DB_PER_HZ * tight
    chest_db = chest_db + CHEST_GROWS * extra_db - squeeze_db
    mouth_db = mouth_db + MOUTH_GROWS * extra_db - squeeze_db
    lips_db = nose_db + LIPS_SHUT_DB + LIPS_SPAN_DB * opening
    teeth_db = nose_db + TEETH_DB + TEETH_LOOSE_DB * loose_depth
    teeth_db = teeth_db + TEETH_GROWS * (np.maximum(throat_db, -40) - FULL_DB)

    throb_rate = curves(flutter)[0] * (T >= flutter[0][0])
    throb = 2 * np.pi * (FLUTTER_START[which] + np.cumsum(throb_rate) / SR)
    cycles = np.cumsum(hz * (1 + .02 * wobble(30) + .015 * np.cos(2 * throb + 2.2))) / SR
    jitter = 0.043 + 0.063 * depth - .03 * np.cos(throb)
    rasp = unit(rng.standard_normal(N) * (1 + np.cos(2 * np.pi * cycles)) ** 2)
    source = folds(cycles, jitter, scatter_db=2.0, sub_db=2.0) + 0.42 * rasp

    chest = np.sin(2 * np.pi * cycles) + 0.15 * unit(cavity(rasp, 1.4 * hz, 79))
    chest = swell(throb, 0.46 + 0.75 * depth, 0) * invert_db(1.6 * wobble(25)) * chest
    second = swell(throb, 0.41, 5.2) * two_cavities(source, second_ratio * hz, 70, 130)
    lips = filtered(.4 * source + rasp, lambda f: modes(LIPS)(f) / (1 + (f / 3100) ** 8))
    voice = invert_db(chest_db) * (even(chest, 0.57) + invert_db(second_db) * even(second, 0.18))
    voice += invert_db(throat_db) * throat_voice(source, rasp, cycles, throb, depth, throat_hz, tight, CLEAR[which])
    voice += invert_db(mouth_db) * mouth_voice(source, rasp, throb, rattle)
    voice += invert_db(lips_db) * even(swell(throb, 0.2, 1.7) * lips, 0.33)

    air = rng.standard_normal((2, 3, N))
    air = 1.1 * air[:, :1] + air[:, 1:]
    air = air * (1 + .3 * np.cos(2 * np.pi * cycles))
    muffled_db = SHUT_DB * gate(NOSTRILS_SHUT_S[which], N / SR, .05, 1)
    breath = invert_db(nose_db - 1.0 + muffled_db) * nose_breath(air[0], throb)
    breath += invert_db(teeth_db + 6 - 5.5 * rattle) * teeth_breath(air[1], throb, loose_depth, opening)
    start, end = rows[0][0], rows[-1][0]
    return voice * gate(start, end, 0.043, .06), breath * gate(start - lead_s + 0.24, end, .5, .06)


def scene():
    background = yard() + bird()
    details = clicks() + sniffs()
    barks = bark(0, lag=23, pan_db=-1.5, wet_db=-4) + bark(1, lag=-1, pan_db=-3.0, wet_db=-0.5)
    first, first_breath = growl(GROWLS[0], 0)
    long, long_breath = growl(GROWLS[1] + GROWLS[2], 1)
    growls = placed(first, lag=28, pan_db=-2.0, wet_db=1) + placed(long, lag=6.024, pan_db=0.2, wet_db=-2.5)
    breath = filtered(first_breath, arrival(21)) + filtered(long_breath, arrival(5.64))
    return background + details + barks + growls + breath


def low_pass(x):
    return signal.sosfilt(signal.butter(12, 16340, fs=SR, output="sos"), x)


def record(dry):
    clipped = dry / (1 + abs(dry) ** 8) ** (1 / 8)
    mix = filtered(clipped, lambda f: f < 15900)
    return low_pass(mix)


dry = scene()
out = record(dry)
dump(out)
```